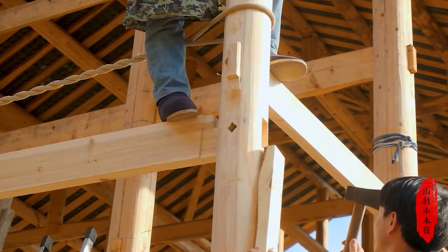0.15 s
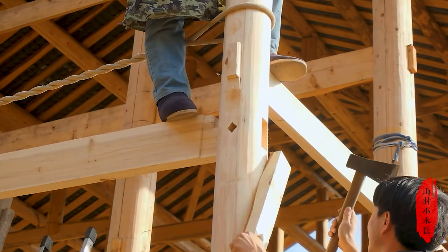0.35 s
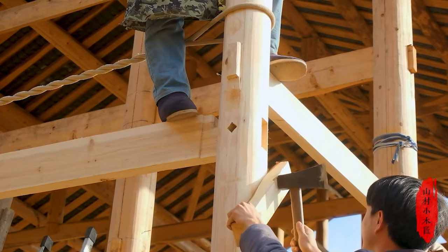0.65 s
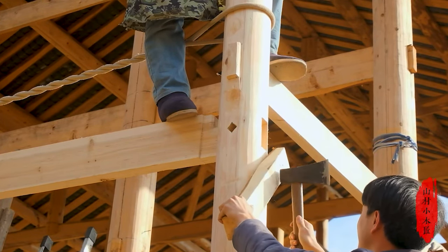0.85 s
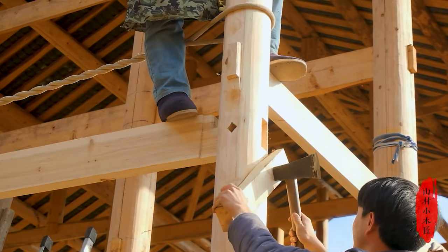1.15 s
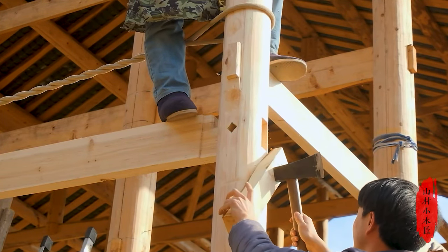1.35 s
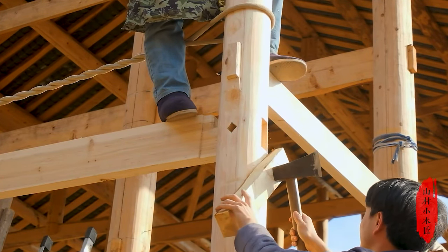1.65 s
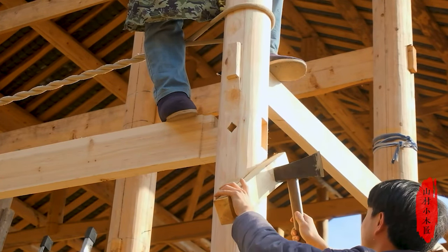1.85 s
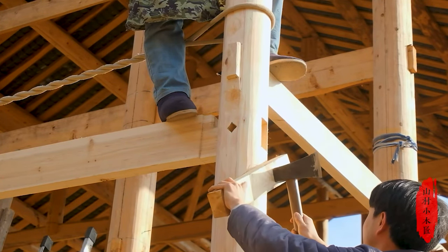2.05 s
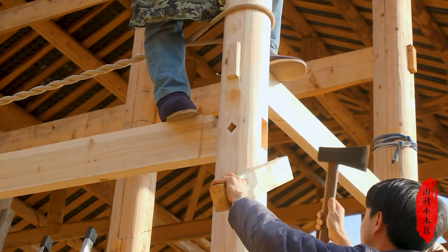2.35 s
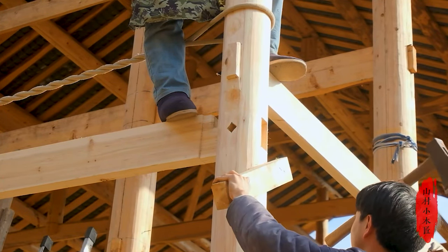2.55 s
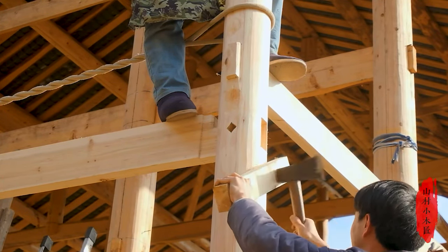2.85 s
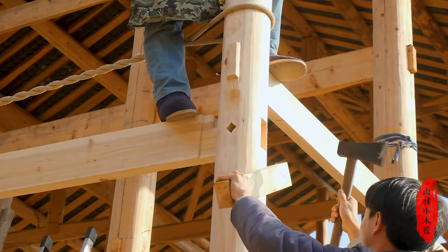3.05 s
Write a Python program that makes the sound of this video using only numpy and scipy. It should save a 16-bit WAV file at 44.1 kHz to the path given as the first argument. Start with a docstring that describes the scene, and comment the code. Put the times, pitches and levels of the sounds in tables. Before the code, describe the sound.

Hammering on timber under an open roof. A scrape, tick and loose plank bumps come within 0.3 s, a faint scrape at 0.5. A heavy mallet cracks on a post at 0.7, with a rebound click. A faint knock at 1.0, light sleeve rustle, then ringing peg taps at 1.6, 1.9 and 2.5, the last bouncing. At 2.9 the loudest beam blow booms, overloading the microphone. Quiet hiss, whir and wind beneath.

```python
"""Under an open roof, a timber frame is assembled. A heavy mallet lands once on a post and once on a beam,
overloading the microphone; between these a hammer taps a wooden peg three times.
Each blow is a noise burst of dense overtones, plus decaying sine modes and a diffuse roof answer where set.
Loose timber knocks and scrapes; shaped noise makes the sleeve, quiet hiss, distant whir and gusts."""
import sys
import numpy as np
from scipy import signal
from scipy.fft import rfft, irfft, next_fast_len
from scipy.io import wavfile

SR = 44100
rng = np.random.default_rng(int(sys.argv[2]) if len(sys.argv) > 2 else 0)


def file_out(sig):
    """Save sig as 16-bit WAV at sys.argv[1]."""
    # one column per channel
    cols = np.atleast_2d(sig).T
    # limit, then scale
    lim = np.clip(cols, -1, 1)
    pcm = np.round(lim * 32767).astype(np.int16)
    wavfile.write(sys.argv[1], SR, pcm)


N = 141120
T = np.arange(int(0.8 * SR)) / SR  # time axis of one blow, s
LEFT_RIGHT = np.array([[1], [-1]])


def amp(db):
    """Decibels to gain."""
    return 10 ** (np.asarray(db) / 20)


def unit(x):
    """Scale to rms 1."""
    return x / np.sqrt(np.mean(x ** 2) + 1e-20)


def along(points, hz):
    """Interpolate (freq_hz, value) points on a log frequency axis."""
    point_hz, value = np.transpose(points)
    return np.interp(np.log(hz + 1), np.log(point_hz + 1), value)


def filtered(x, response):
    """Multiply the spectrum of x by a response of frequency."""
    n = x.shape[-1]
    padded = next_fast_len(n + 8192)
    spectrum = rfft(x, padded) * response(np.fft.rfftfreq(padded, 1 / SR))
    return irfft(spectrum, padded)[..., :n]


def half_angle(alike, hz):
    """Mid-side angle in radians that gives the left-right correlation."""
    return np.arccos(np.clip(along(alike, hz), -1, 1)) / 2


def noise(colour, alike, size):
    """Coloured stereo noise of rms 1; mid and side shares set its left-right correlation."""
    def mid_side_gain(hz):
        angle = half_angle(alike, hz)
        return amp(along(colour, hz)) * [np.cos(angle), np.sin(angle)]
    mid, side = filtered(rng.standard_normal((2, size)), mid_side_gain)
    return unit(np.array([mid + side, mid - side]))


def swells(rows):
    """Sum of bell-shaped gains, each down to 1/e at half_width_s from its peak."""
    t = np.arange(N) / SR
    return sum(amp(db) * np.exp(-((t - peak_s) / half_width_s) ** 2) for peak_s, half_width_s, db in rows)


# outdoor hiss spectrum: freq_hz, relative_db
AIR_COLOUR = [(15, -16.5), (25, 4), (48, -5), (195, -15), (236, -12), (309, -17), (363, -13.5),
              (405, -16.5), (503, -16), (775, -18), (863, -14), (962, -23), (1100, -13), (1740, -20.5),
              (2990, -13.5), (3430, -18), (12500, -42), (14800, -64), (16000, -72)]
# hiss stereo: freq_hz, left_right_correlation
AIR_CORRELATION = [(60, 0.53), (240, 0.82), (950, 0.78), (3770, 0.21), (15000, -0.72)]
# narrow far-off whir spectrum: freq_hz, relative_db
WHIR_COLOUR = [(2400, -46), (2800, -24.5), (2930, 15.5), (3100, -26), (3600, -16)]
# wind on the microphone: peak_s, half_width_s, level_db
WIND_GUSTS = [(.56, 0.081, -43), (1.25, 0.2, -40.5)]
# wind spectrum: freq_hz, relative_db
RUMBLE_COLOUR = [(20, 13.5), (60, -2.5), (130, -27), (500, -65)]
# diffuse stereo, shared by roof, modes, whir, cloth and scrapes: freq_hz, left_right_correlation
ROOF_CORRELATION = [(150, 1), (450, 1), (1000, 0.71), (2200, 0.36), (6000, 0.025)]
AIR_DB, WHIR_DB = -51, -60


def outdoors():
    """Steady air noise, a narrow-band whir and low-frequency wind gusts."""
    air = amp(AIR_DB) * noise(AIR_COLOUR, AIR_CORRELATION, N)
    whir = amp(WHIR_DB) * noise(WHIR_COLOUR, ROOF_CORRELATION, N)
    wind = swells(WIND_GUSTS) * noise(RUMBLE_COLOUR, [(50, 0.3)], N)
    return air + whir + wind


# arm swings: peak_s, half_width_s, level_db
SLEEVE_RUSTLES = [(1.24, 0.039, -60), (1.565, 0.028, -53), (1.84, .02, -62)]
# cloth spectrum: freq_hz, relative_db
CLOTH_COLOUR = [(500, -14), (2000, -5), (4800, 3), (8000, -8), (15000, -18)]


def sleeve():
    """Cloth friction as the arm swings: brief swells of coloured noise."""
    return swells(SLEEVE_RUSTLES) * noise(CLOTH_COLOUR, ROOF_CORRELATION, N)


def dying(x, t60_of, rise_s, tilt_db_per_octave=0):
    """Noise with a quick rise and frequency-dependent decay; tilt pivots near 1 kHz."""
    hz, t, z = signal.stft(x, SR, nperseg=128)
    hz = hz[:, None]
    decay_db = -60 * t / t60_of(hz)
    tilt_db = tilt_db_per_octave * np.log2((hz + 100) / 1000)
    decayed = signal.istft(z * amp(decay_db + tilt_db), SR, nperseg=128)[1][:, :len(T)]
    return decayed * (1 - np.exp(-T / rise_s))


def ring(modes, rise_s):
    """Exponentially decaying sine modes with random level and phase; left-right phase follows correlation."""
    out = np.zeros((2, len(T)))
    for hz, db, t60_s in modes:
        level_db, phase, spread = rng.standard_normal(3)
        apart = np.sign(spread) * half_angle(ROOF_CORRELATION, hz) * LEFT_RIGHT
        decay = amp(-60 * T / t60_s)
        out += amp(db + level_db) * decay * np.sin(2 * np.pi * hz * T + np.pi * phase + apart)
    return out * (1 - np.exp(-T / rise_s))


def placed(rows, blow_of):
    """Add each blow at its start_s, scaled by its level_db."""
    out = np.zeros((2, N + len(T)))
    for start_s, level_db, bright_db in rows:
        out[:, round(start_s * SR):][:, :len(T)] += amp(level_db) * blow_of(bright_db)
    return out[:, :N]


FRAME_RISE_S = 0.084


def booming(rows, modes):
    """Low modes of the joined timbers build up slowly after each blow."""
    return placed(rows, lambda _: ring(modes, FRAME_RISE_S))


# roof decay: freq_hz, t60_s
ROOF_T60 = [(60, 0.7), (250, 0.32), (1000, 0.52), (2500, 0.4), (6000, 0.33), (15000, 0.26)]
# direct burst stereo: freq_hz, left_right_correlation
DIRECT_CORRELATION = [(200, 0.9), (700, 1), (2000, 0.93), (8000, 0.31)]
ROOF_RISE_S = 0.004
SAME_SHARE = 0.59  # power share of burst and roof noise repeated from blow to blow
DAMPING = 0.22  # t60 falls as (hz + 1000) to this power


def strikes(rows, colour, modes, t60_s, rise_s, ring_db=0, roof_db=-60, tilt_db=0, lead_ms=0):
    """Each blow: dense overtone burst, ringing modes and diffuse roof answer, tilted by brightness."""
    def left_lead(hz):
        return np.exp(1j * np.pi * hz * lead_ms / 1000 * LEFT_RIGHT)

    def wood_t60(hz):
        return t60_s * ((hz + 1000) / 2000) ** -DAMPING

    def response():
        overtones = filtered(noise(colour, DIRECT_CORRELATION, len(T)), left_lead)
        burst = dying(overtones, wood_t60, rise_s)
        diffuse = noise(colour, ROOF_CORRELATION, len(T))
        roof = dying(diffuse, lambda hz: along(ROOF_T60, hz), ROOF_RISE_S, tilt_db)
        return burst + amp(roof_db) * roof

    same = np.sqrt(SAME_SHARE) * response() + amp(ring_db) * ring(modes, rise_s)

    def blow(bright_db):
        varied = same + np.sqrt(1 - SAME_SHARE) * response()
        return filtered(varied, lambda hz: amp(bright_db * np.log2((hz + 300) / 1300)))

    return placed(rows, blow)


# loose plank: start_s, level_db, brightness_db_per_octave
PLANK_HITS = [(.1238, -29.5, 1), (.197, -30.5, 1.5), (.238, -29, -1)]
# plank ringing: pitch_hz, mean_level_db, t60_s
PLANK_RINGING = [(353, 1, 0.39), (430, -17, 0.34), (568.7, -10.5, 0.5), (871, -15, 0.45),
                 (1840, -9.5, 0.17), (1970, 1.5, 0.034), (3400, -33, 0.036), (4830, -17, 0.025)]
# plank overtones: freq_hz, relative_db
PLANK_COLOUR = [(80, -31), (330, -8), (800, -2), (1500, -9), (1900, 1.5), (2400, -26), (3200, -11),
                (5500, -25), (12000, -45.5)]
# knocks further off in the frame: start_s, level_db, brightness_db_per_octave
FAR_HITS = [(.136, -33, -4.5), (.264, -28.5, 4.5), (.286, -43.5, -4), (.998, -32.5, -1), (2.187, -40, 5.5),
            (2.228, -37.5, 8.5), (2.278, -42.5, 2)]
# far timber ringing: pitch_hz, mean_level_db, t60_s
FAR_RINGING = [(236.2, -8, 0.367), (378, 0.5, 0.27), (450, -7.5, 0.47), (535, -4, .22), (697, -2, 0.12),
               (850, -14.5, .15), (1253, -7, 0.23)]
# far timber overtones: freq_hz, relative_db
FAR_COLOUR = [(60, -43), (220, -9), (450, 0.5), (750, -6), (1400, -18.5), (3000, -27), (10000, -68)]
# sharp ticks: start_s, level_db, brightness_db_per_octave
TICK_HITS = [(.046, -29, -4.5), (1.435, -70, 6.5), (2.187, -25, -10.5)]
# tick and rebound overtones: freq_hz, relative_db
TICK_COLOUR = [(200, -29), (2000, 6.5), (7000, 7.5), (16000, 0.5)]
# wood sliding on wood: peak_s, half_width_s, level_db
WOOD_SCRAPES = [(.005, 0.067, -39), (.49, 0.021, -44.5)]
# scrape spectrum: freq_hz, relative_db
SCRAPE_COLOUR = [(100, -2), (500, -1), (2200, -1), (5000, -10.5), (8000, -21.5), (16000, -38)]


def loose_timber():
    """Handled pieces: short-decay bumps, far knocks and ticks, plus friction noise."""
    plank = strikes(PLANK_HITS, PLANK_COLOUR, PLANK_RINGING, t60_s=0.038, rise_s=0.00095,
                    ring_db=0, roof_db=-12.5, tilt_db=-7)
    far = strikes(FAR_HITS, FAR_COLOUR, FAR_RINGING, t60_s=0.086, rise_s=0.002,
                  ring_db=-5, roof_db=-12, tilt_db=-3.5)
    ticks = strikes(TICK_HITS, TICK_COLOUR, [], t60_s=0.025, rise_s=0.00011, roof_db=-13.5, tilt_db=1)
    scrapes = swells(WOOD_SCRAPES) * noise(SCRAPE_COLOUR, ROOF_CORRELATION, N)
    return plank + far + ticks + scrapes


# hammer on peg: start_s, level_db, brightness_db_per_octave
PEG_HITS = [(1.6058, -15, 0.5), (1.8753, -16.5, 0.5), (2.5384, -16, 1.14)]
# hammer bounce on peg: start_s, level_db, brightness_db_per_octave
BOUNCE_HITS = [(2.5535, -24.5, 3)]
# peg ringing: pitch_hz, mean_level_db, t60_s
PEG_RINGING = [(385, -7, 0.26), (428, -1, 0.19), (604, -2.5, 0.22), (693, -3, 0.099), (857, -10.5, 0.3),
               (982, -3, 0.08), (1109, -12.5, 0.12), (1197, -5, 0.12), (1637, 0, 0.13), (1760, -6, 0.15),
               (1950, -2.5, 0.084), (2352, 0.5, 0.073), (2594, -11, 0.047), (2735, -1, 0.11),
               (2940, -4, 0.047), (2997, -1, 0.057), (4409, -5, 0.061), (5450, -5.5, 0.049)]
# peg overtones: freq_hz, relative_db
PEG_COLOUR = [(60, -24), (160, -13), (290, -14.5), (420, 3.5), (650, -0.5), (950, 1), (1350, -7.5),
              (1750, 2), (3050, 0.5), (3500, -7), (5200, -10.5), (7000, -16), (10000, -26.5), (16000, -34)]
# post that holds the peg: pitch_hz, mean_level_db, t60_s
PEG_POST_RINGING = [(238, -16, 0.35), (266, -47, .35)]
TOUCH_LEAD_S, TOUCH_DB = 0.0029, -3  # relative to its tap
PEG_LEAD_MS = 0.08  # peg nearer to the left port
WALL_ECHO_S, WALL_ECHO_DB, WALL_ECHO_CUTOFF_HZ = 0.041, -10, 1500


def hammer():
    """Peg taps: dull pre-touch, ringing impact, one lowpassed wall echo and post boom; the last bounces."""
    touches = [(start_s - TOUCH_LEAD_S, db + TOUCH_DB, bright) for start_s, db, bright in PEG_HITS]
    touch = strikes(touches, PEG_COLOUR, [], t60_s=0.022, rise_s=0.0011)
    dull_touch = filtered(touch, lambda hz: 1 / (1 + (hz / 3600) ** 8))
    taps = strikes(PEG_HITS + BOUNCE_HITS, PEG_COLOUR, PEG_RINGING, t60_s=0.097, rise_s=0.00055,
                   ring_db=-8.5, roof_db=-15, tilt_db=1, lead_ms=PEG_LEAD_MS)

    def wall(hz):
        return np.exp(-2j * np.pi * hz * WALL_ECHO_S) / (1 + 1j * hz / WALL_ECHO_CUTOFF_HZ)

    echo = amp(WALL_ECHO_DB) * filtered(taps, wall)
    return dull_touch + taps + echo + booming(PEG_HITS, PEG_POST_RINGING)


# mallet on post: start_s, level_db, brightness_db_per_octave
POST_HITS = [(.7062, -4.5, -0.5)]
# post ringing: pitch_hz, mean_level_db, t60_s
POST_RINGING = [(334, -6, 0.36), (621, -1.5, 0.23), (774.4, 5.5, 0.28), (900, -25, 0.11), (1118, -23, 0.69),
                (1273, -13, 0.39), (1710, -34, 0.38), (1913, 7, 0.17), (2504, -7.5, 0.25),
                (3270, -26, 0.18), (3670, 1.5, 0.15), (4200, -44, 0.064)]
# post overtones: freq_hz, relative_db
POST_COLOUR = [(40, -41), (110, -23.5), (200, -14.5), (400, -7.5), (700, -2.5), (1300, -8), (2100, -6.5),
               (2900, -17.5), (5000, -21.5), (9000, -34.5), (16000, -38)]
# mallet rebound click: start_s, level_db before REBOUND_DB, brightness_db_per_octave
REBOUND_HITS = [(.7522, -18.5, 2)]
# mallet on beam: start_s, level_db, brightness_db_per_octave
BEAM_HITS = [(2.9165, 5.5, -2.5)]
# beam ringing: pitch_hz, mean_level_db, t60_s
BEAM_RINGING = [(368, -17.5, 0.47), (425.5, -10.5, 0.42), (517, 1.5, 0.34), (610, -7, 0.39),
                (776.8, 2.5, 0.39), (928.5, -7.5, 0.82), (975, -18.5, 0.98), (968, 9.5, 0.26),
                (1241, -7, 0.53), (1434, -20, 1), (1710, -37, 0.36), (1805, -2, 0.38), (2080, -25.5, 0.52),
                (2110, -18, 1), (2256, -4, 0.19), (2210, 2, 0.07)]
# beam overtones: freq_hz, relative_db
BEAM_COLOUR = [(30, -25), (70, -17.5), (130, -29.5), (200, -6.5), (280, -17.5), (400, -4), (620, -9.5),
               (950, 0), (1500, -11), (2200, -9.5), (3200, -13.5), (6500, -19), (16000, -23.5)]
# whole-frame boom: pitch_hz, mean_level_db, t60_s
FRAME_RINGING = [(68.3, -16, 0.51), (94.5, -12, 0.34), (195.5, 1.5, 0.24), (340, -5.5, 0.23),
                 (360.4, -4, 0.276)]
CRACK_DB, REBOUND_DB = 10, -1


def mallet():
    """Heavy blows: the post cracks and the mallet rebounds; the beam sets the whole frame booming."""
    post = strikes(POST_HITS, POST_COLOUR, POST_RINGING, t60_s=0.11, rise_s=0.00023,
                   ring_db=-14, roof_db=-9, tilt_db=-2, lead_ms=0.019)
    crack = strikes(POST_HITS, POST_COLOUR, [], t60_s=0.015, rise_s=0.00039)
    rebound = strikes(REBOUND_HITS, TICK_COLOUR, [], t60_s=0.012, rise_s=0.0001, roof_db=-14, tilt_db=-2.5)
    beam = strikes(BEAM_HITS, BEAM_COLOUR, BEAM_RINGING, t60_s=0.2, rise_s=0.00033,
                   ring_db=-14, roof_db=-3.5, tilt_db=-2)
    frame = booming(BEAM_HITS, FRAME_RINGING)
    return post + amp(CRACK_DB) * crack + amp(REBOUND_DB) * rebound + beam + frame


def scene():
    """Building site at the microphone: sum of all sources."""
    return outdoors() + sleeve() + loose_timber() + hammer() + mallet()


# port balance: freq_hz, left_minus_right_db
PORT_BALANCE = [(60, -2), (250, 0), (1300, -0.2), (4400, 0.5), (10000, 1)]
CLIP_TOP, CLIP_HARDNESS = 0.64, 15  # full-scale limit, knee exponent
LOW_CUT_HZ, TOP_HZ = 76, 16100


def record(dry):
    """Input saturation, first-order low cut, slightly brighter left port and steep band limit."""
    clipped = dry / (1 + np.abs(dry / CLIP_TOP) ** CLIP_HARDNESS) ** (1 / CLIP_HARDNESS)
    low_cut = signal.butter(1, LOW_CUT_HZ, "highpass", fs=SR, output="sos")
    lean = signal.sosfilt(low_cut, clipped)
    balanced = filtered(lean, lambda hz: amp(along(PORT_BALANCE, hz) * LEFT_RIGHT / 2))
    return filtered(balanced, lambda hz: 1 / (1 + (hz / TOP_HZ) ** 100))


dry = scene()
out = record(dry)
file_out(out)
```